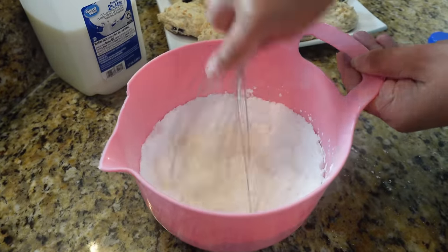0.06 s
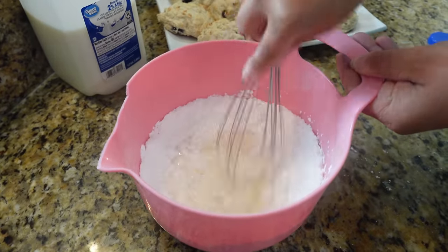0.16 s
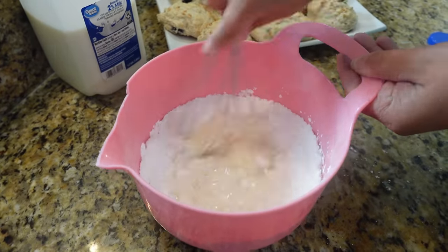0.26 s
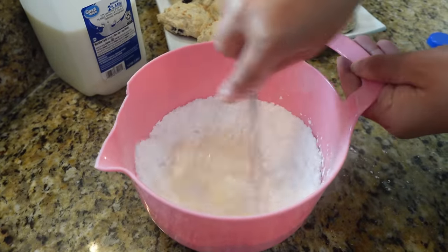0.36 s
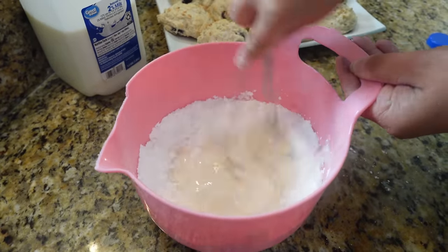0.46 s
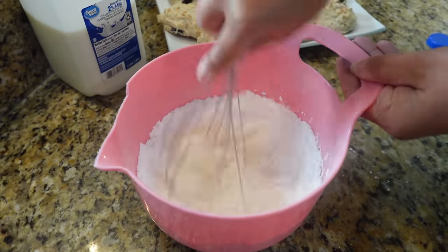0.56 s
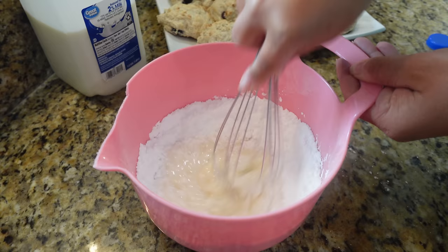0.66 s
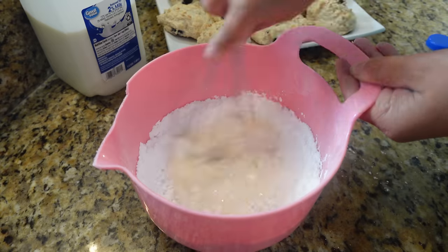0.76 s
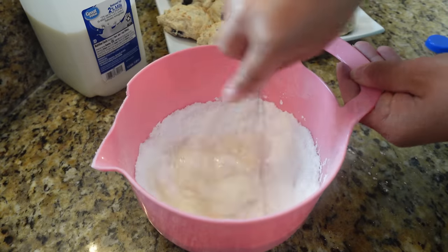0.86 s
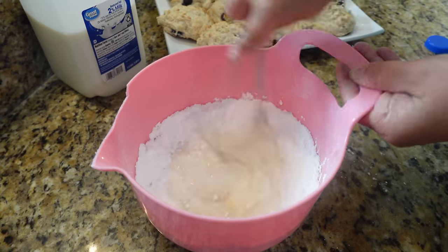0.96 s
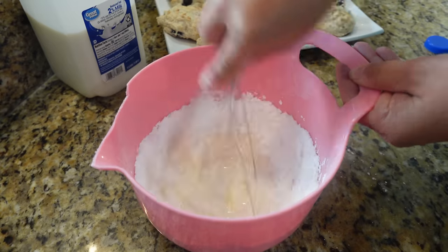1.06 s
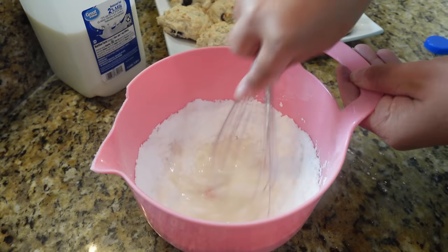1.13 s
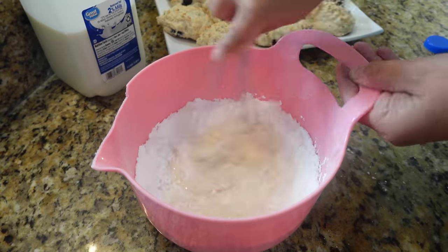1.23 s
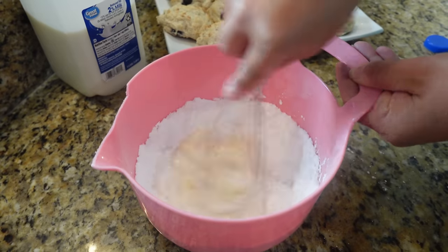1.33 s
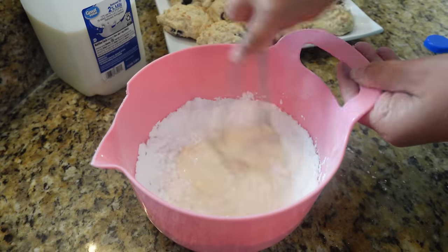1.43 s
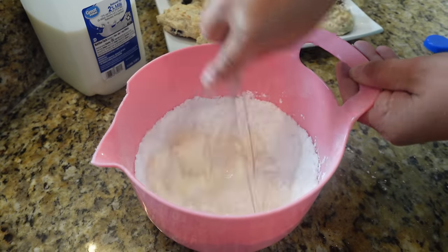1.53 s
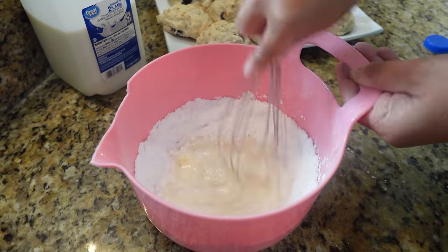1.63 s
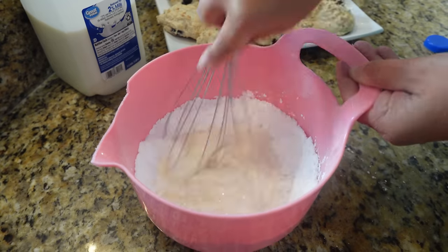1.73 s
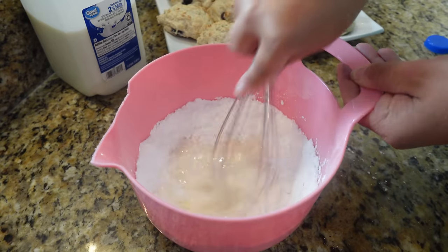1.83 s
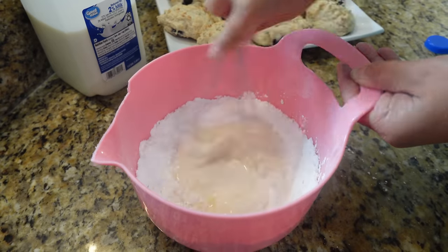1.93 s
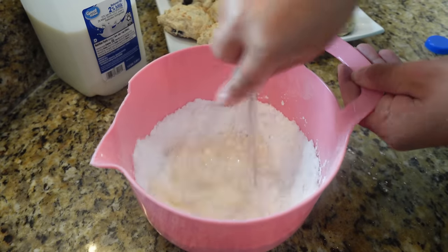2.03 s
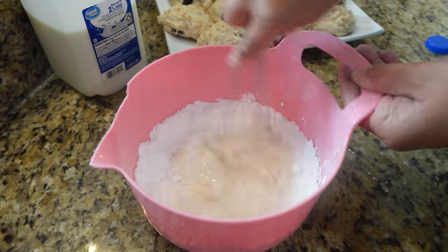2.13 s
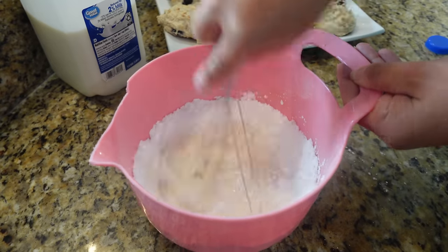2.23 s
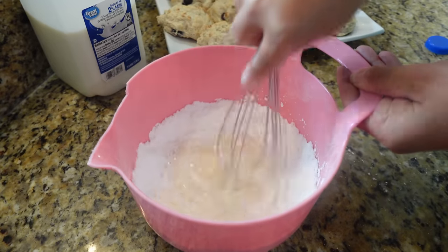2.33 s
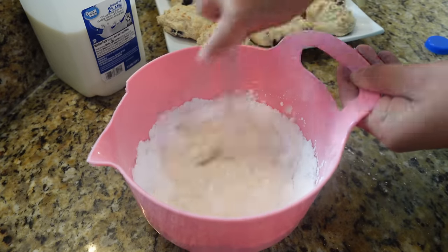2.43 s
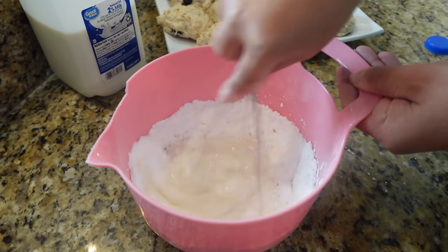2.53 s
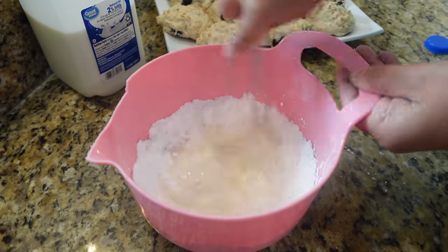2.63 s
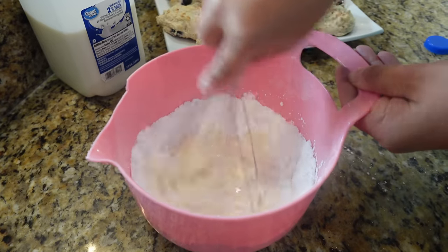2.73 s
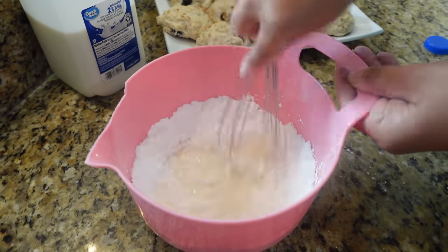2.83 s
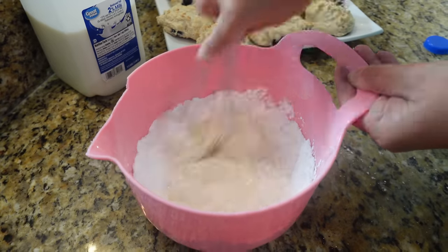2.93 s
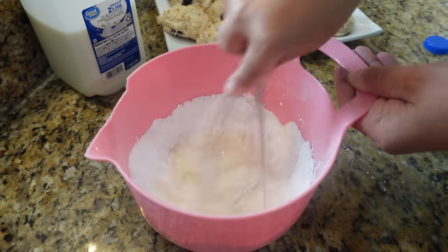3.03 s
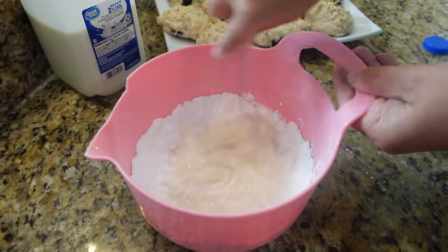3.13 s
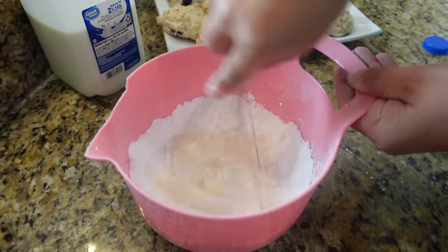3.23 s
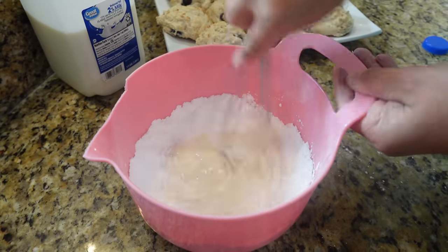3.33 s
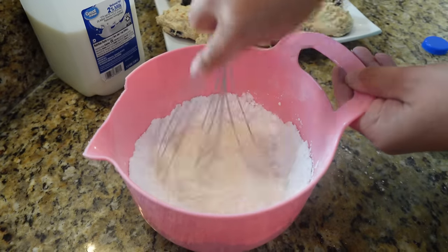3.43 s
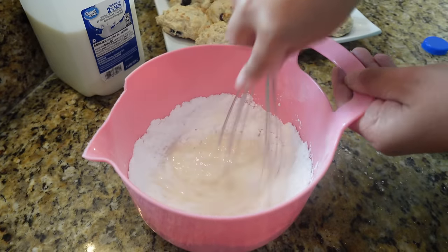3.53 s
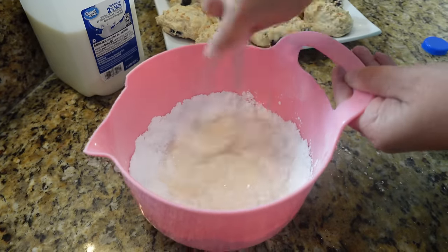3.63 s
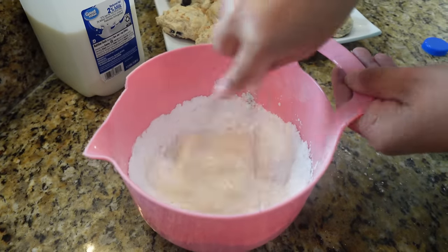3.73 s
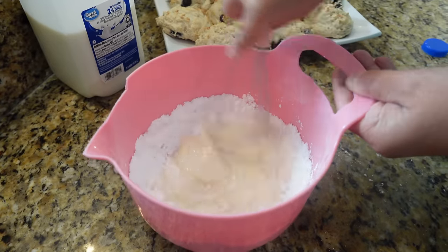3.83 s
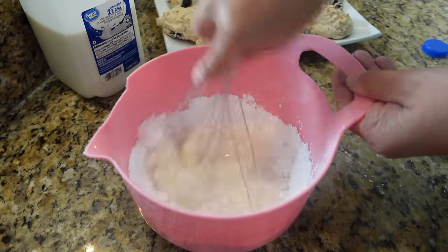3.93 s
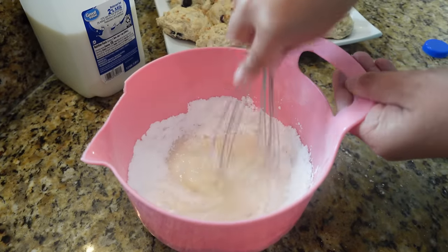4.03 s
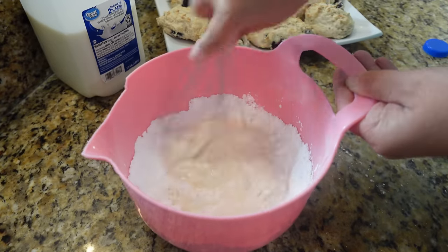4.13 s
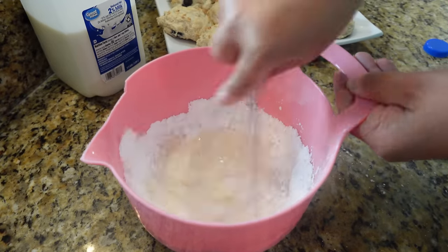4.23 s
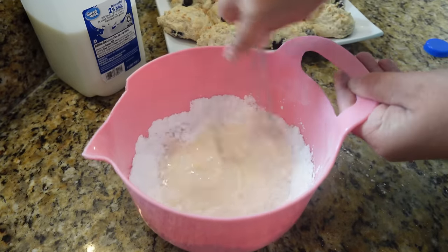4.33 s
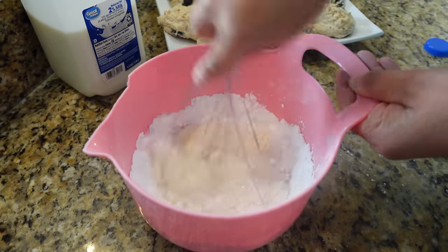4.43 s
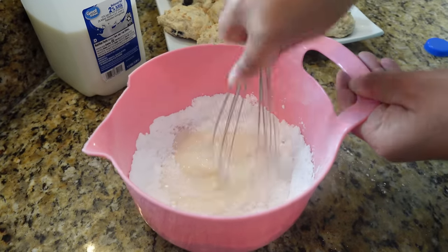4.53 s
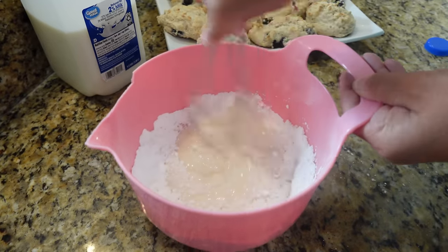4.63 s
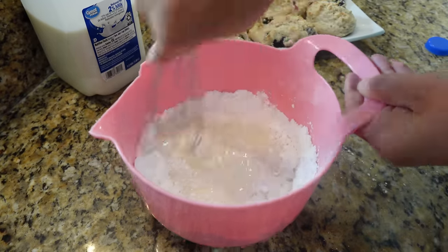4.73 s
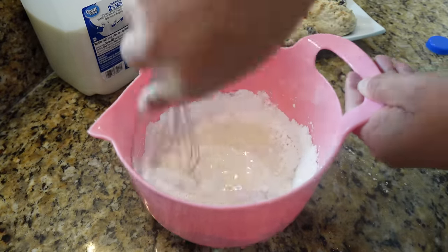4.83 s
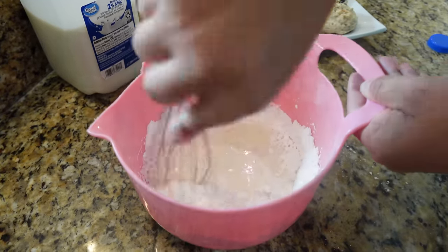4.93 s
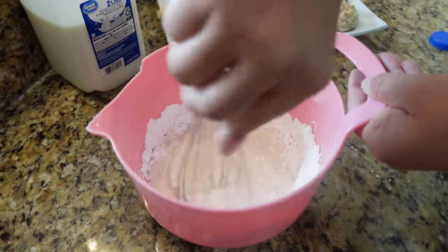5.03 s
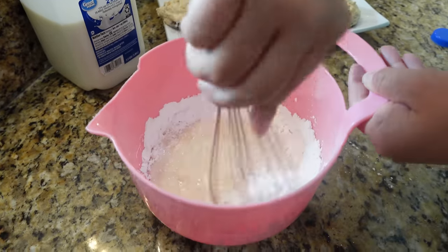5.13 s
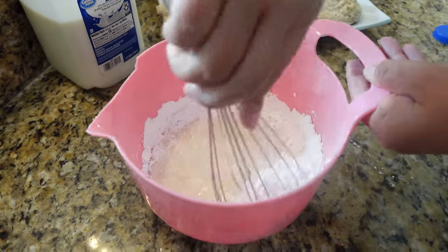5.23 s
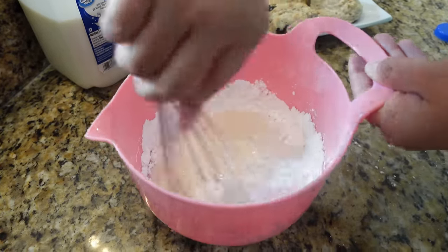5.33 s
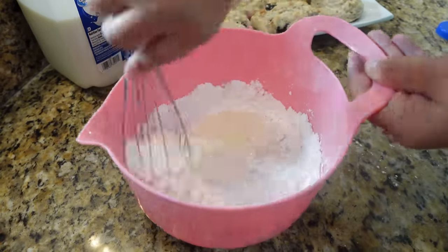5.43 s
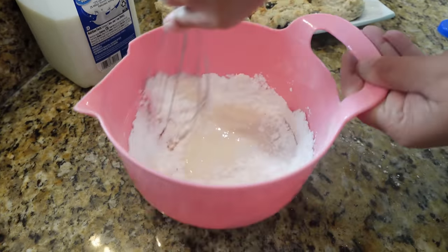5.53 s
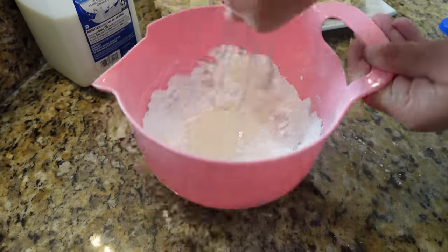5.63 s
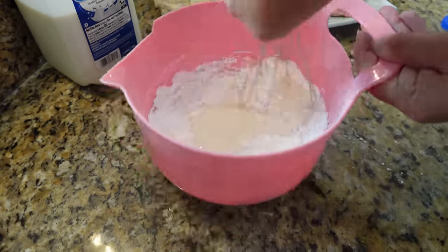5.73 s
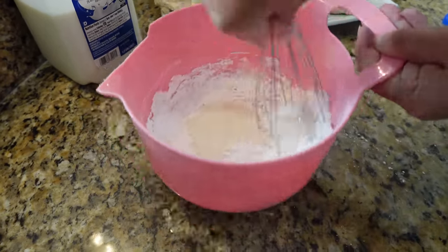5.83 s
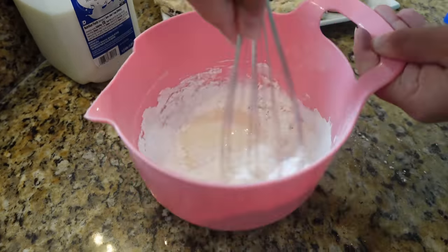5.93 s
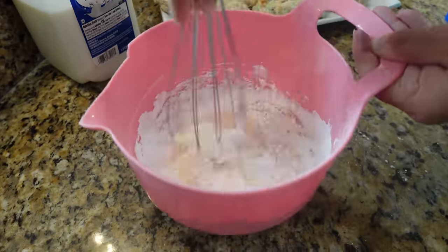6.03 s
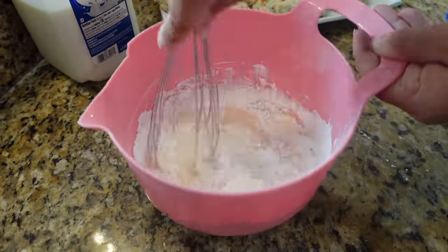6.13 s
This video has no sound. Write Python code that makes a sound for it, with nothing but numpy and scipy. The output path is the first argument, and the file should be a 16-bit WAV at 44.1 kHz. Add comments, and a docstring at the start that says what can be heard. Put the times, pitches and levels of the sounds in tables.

```python
"""Whisk in a plastic bowl

Close by, just right of centre, a wire whisk beats thick batter in a plastic bowl on a stone counter,
then scrapes flour off the wall in three long strokes. Stick-slip drag shakes the wall's resonances;
landing wires knock and tick on it, and bursts high in the treble are air pockets tearing in the batter.
The bowl hums as it rocks. A quiet kitchen with a short room echo and a mains hum lies underneath."""
import sys
import numpy as np
from scipy import signal
from scipy.fft import rfft, irfft, next_fast_len
from scipy.io import wavfile
from scipy.ndimage import uniform_filter1d

SR = 44100
rng = np.random.default_rng(int(sys.argv[2]) if len(sys.argv) > 2 else 0)


def undo_db(level):
    """Turn decibels back into plain size, where 20 dB means ten times bigger."""
    steps = np.asarray(level, float) / 20
    return 10 ** steps


def bounce(signal):
    """Save signal as a 16-bit WAV file at the path given by the first command-line argument."""
    frames = np.transpose(np.atleast_2d(signal))
    limited = np.clip(frames, -1, 1)
    pcm = np.round(limited * 32767).astype(np.int16)
    wavfile.write(sys.argv[1], SR, pcm)


N = 272097  # samples

# Levels in the tables and settings of the bowl are those ahead of its small level corrections.
# bowl wall resonances: (frequency [Hz], width [Hz], level while beating [dB], level while scraping [dB])
WALL = [(607, 64, -1, -4.5), (760, 130, -3, -7.5), (946, 275, -8, -12.5), (1280, 96, 0, 3),
        (1750, 260, -7, -10.5), (1990, 190, -2.5, 1.5), (2333, 254, 1.5, 2), (3095, 730, -5, -3),
        (3600, 340, -2.5, -1), (4080, 430, -2, -2), (4670, 740, -3.5, -7), (6130, 760, -8.5, -13),
        (7200, 950, -13.5, -15)]
# turns of the wrist: (loops meet the wall [s], loops leave it [s], swish on meeting [dB], drag [dB])
TURNS = [(0.062, 0.11, -36.5, -3), (0.304, 0.401, -38.5, 1.5), (0.563, 0.643, -47, -2.5),
         (0.828, 0.893, -39.5, 0), (1.055, 1.136, -41, 1), (1.303, 1.35, -41, 0), (1.535, 1.596, -39, -0.5),
         (1.751, 1.83, -43, 0.5), (2, 2.06, -45, 1.5), (2.222, 2.307, -42, 1), (2.477, 2.548, -35, 0.5),
         (2.725, 2.79, -34.5, 0.5), (2.974, 3.044, -32.5, 2), (3.207, 3.297, -37, 0), (3.45, 3.51, -36, 1),
         (3.691, 3.767, -38, 1), (3.95, 4.01, -42, 1.5), (4.178, 4.247, -40, 1), (4.437, 4.499, -38.5, 1)]
# loops rattling on the wall: (time [s], low ring level [dB], high ring level [dB],
# frequency of the leading ring [Hz], nominal length [s])
KNOCKS = [(.14, -38, -35.5, 3370, 0.012), (.237, -49, -39, 3300, .003), (.336, -46, -51, 600, 0.012),
          (0.399, -36, -40, 1800, 0.01), (.541, -37.5, -38, 1230, 0.0044), (0.593, -43, -54, 1030, .018),
          (0.658, -33.5, -37, 1180, 0.0077), (0.812, -33, -39, 1580, 0.0021),
          (0.869, -40, -34, 4200, 0.0048), (0.875, -36, -38, 760, 0.012), (.904, -36, -27, 2820, 0.0086),
          (.911, -42, -32, 3900, .008), (0.964, -42, -39.5, 2780, .008), (1.06, -36.5, -48, 1120, 0.018),
          (1.116, -28.5, -41, 1210, 0.0068), (1.151, -33.5, -50, 683, 0.0075),
          (1.15, -29.5, -50, 1650, .009), (1.148, -34.5, -27.5, 2800, 0.0096),
          (1.333, -38, -45, 1120, .016), (1.362, -48, -35, 3500, .003), (1.373, -45, -26.5, 3270, 0.0025),
          (1.38, -43, -35, 3400, 0.0073), (1.518, -36, -42, 1710, 0.0031), (1.582, -37.5, -44, 760, 0.009),
          (1.61, -40, -33, 3780, 0.0035), (1.619, -48, -33, 3300, .007), (1.621, -36, -48, 784, 0.006),
          (1.752, -48, -39, 4200, .005), (1.809, -36, -48, 780, 0.0063), (1.844, -34.5, -46, 1750, .0085),
          (1.854, -38, -38, 2600, .003), (1.913, -40, -44, 1500, .006), (2.049, -31, -39, 895, 0.0091),
          (2.073, -34.5, -31, 900, 0.011), (2.286, -32, -50, 1060, 0.0073),
          (2.318, -34.5, -35, 3450, 0.011), (2.487, -35.5, -37, 1710, 0.011), (2.507, -41, -38, 674, 0.006),
          (2.54, -34.5, -42, 836, 0.0056), (2.57, -26, -28, 2560, 0.0076), (2.616, -36, -35, 1590, 0.0041),
          (2.721, -42, -29, 2170, 0.0032), (2.777, -27.5, -43, 1250, 0.0075),
          (2.807, -37, -33, 1620, 0.0085), (2.819, -32, -28.5, 1750, 0.0053), (2.861, -48, -39, 3800, .004),
          (2.968, -42, -33, 2290, .003), (3.032, -29.5, -37, 1010, 0.0064),
          (3.057, -32.5, -32.5, 2800, 0.016), (3.262, -34, -46, 860, 0.0055),
          (3.296, -33.5, -35, 2980, .01), (3.324, -37.5, -44, 696, 0.006),
          (3.509, -21.5, -37, 1530, 0.0044), (3.531, -36, -31.5, 3300, 0.0069),
          (3.685, -40, -41, 1660, .0025), (3.728, -36, -48, 1230, 0.0096), (3.77, -31, -35, 2690, 0.014),
          (3.92, -39, -27.5, 3650, 0.0066), (3.927, -37.5, -28, 4090, 0.0075),
          (3.933, -45, -27.5, 4100, .003), (3.997, -30.5, -44, 920, 0.0044),
          (4.019, -30.5, -37.5, 4200, 0.016), (4.108, -38, -44, 1300, .01), (4.17, -39, -33.5, 1900, .02),
          (4.202, -38, -49, 1290, 0.012), (4.249, -41.5, -35, 2000, .0046),
          (4.272, -31.5, -33, 2880, 0.013), (4.367, -50, -37, 3020, .004),
          (4.486, -36.5, -43, 1480, 0.0082), (4.5, -33.5, -40, 1320, 0.0078),
          (4.537, -43, -33, 2820, 0.0076), (4.731, -45, -23, 3950, 0.0028), (4.744, -45, -30, 3520, .002),
          (4.805, -37.5, -29.5, 4560, .0064), (4.813, -33, -25.5, 2920, 0.0042),
          (4.913, -31, -31, 3600, 0.0052), (4.93, -42, -33.5, 2860, 0.012), (5.014, -37, -34, 2800, .016),
          (5.045, -42, -36, 3600, .02), (5.081, -35, -33, 3090, .009), (5.093, -38, -28.5, 3170, 0.0076),
          (5.111, -36, -34, 3050, .007), (5.139, -37, -31, 3060, 0.0038), (5.16, -44, -31, 2980, 0.0074),
          (5.211, -47, -37, 3200, 0.0094), (5.244, -38.5, -46, 1280, .007), (5.35, -48, -35.5, 3370, .0039),
          (5.411, -38, -29.5, 2750, 0.0062), (5.445, -36, -27, 3480, 0.0053), (5.47, -40, -32, 2400, .003),
          (5.509, -37, -40, 2920, .012), (5.58, -40, -32, 2480, 0.016), (5.613, -42, -26, 3950, 0.0041),
          (5.631, -39, -36, 4400, .0083), (5.671, -35, -42, 624, 0.0073), (5.672, -42, -38, 270, .008),
          (5.779, -56, -39, 3500, 0.029), (5.84, -48, -36, 2630, 0.019), (5.9, -36.5, -38, 1210, 0.011),
          (5.925, -42, -33, 2500, .0036), (5.96, -37, -38, 2460, 0.018), (5.989, -46, -31.5, 2440, .0044),
          (6.162, -34, -46, 1000, 0.0034), (6.163, -38, -50, 400, .005)]
# single wires striking bare wall ahead of a rattle: (time before a fixed lag [s], peak [dB], ring [Hz])
TICKS = [(0.143, -26, 3410), (0.401, -24, 1810), (0.529, -27, 3140), (0.543, -30, 1880), (0.659, -23, 1160),
         (0.811, -26, 2290), (1.118, -23, 1210), (1.373, -21, 3510), (1.518, -26, 2310), (1.609, -21, 3940),
         (1.617, -24, 2900), (1.854, -24, 1310), (2.049, -21, 649), (2.074, -20, 1670), (2.321, -19, 1260),
         (2.615, -25, 1530), (2.721, -22, 2250), (2.78, -20, 1340), (2.812, -22, 1740), (2.97, -22, 2310),
         (3.034, -21, 982), (3.531, -20, 2970), (3.685, -24, 2300), (3.919, -14, 3580), (4.022, -24, 1210),
         (4.246, -23, 1810), (4.271, -22, 1280), (4.368, -27.5, 1390), (4.523, -22, 2900),
         (4.814, -16.5, 2920), (4.918, -19, 3620), (5.11, -22, 3070), (5.139, -23, 3040),
         (5.413, -20, 2780), (5.447, -18, 3430), (5.456, -22, 1840), (5.469, -20, 3250), (5.612, -11, 4010),
         (5.622, -22, 4640), (5.632, -22, 1360), (5.669, -19, 595), (6.16, -27, 1300)]
# air pockets snapping in the batter and wires ticking together:
# (time before a fixed lag [s], peak [dB], centre frequency [Hz])
SNAPS = [(0.1146, -35, 9030), (0.256, -37, 8500), (0.6883, -20.5, 9600), (0.71, -35, 13500),
         (0.7582, -29, 13400), (0.8609, -30, 12700), (0.9448, -34, 11100), (1.1214, -32, 12200),
         (1.1915, -27, 10100), (1.2106, -30, 13700), (1.2311, -30, 12200), (1.254, -31, 14100),
         (1.285, -27, 8300), (1.5693, -35, 10400), (2.0527, -31, 10200), (2.1201, -31, 8740),
         (2.1784, -27, 14500), (2.2533, -35, 10700), (2.3446, -24, 13600), (2.4084, -29, 9800),
         (2.4823, -31, 9200), (2.5067, -31, 13000), (2.5975, -32, 15400), (2.6145, -31, 8500),
         (2.8335, -29, 13700), (2.8619, -37, 11500), (2.8923, -21, 12800), (3.1083, -31, 8680),
         (3.1462, -23, 15000), (3.3797, -19.5, 14300), (3.5793, -34, 10000), (3.6202, -22, 11300),
         (3.8222, -32, 9920), (3.8541, -25, 14700), (3.9196, -15, 10000), (3.9205, -21, 8500),
         (3.9235, -29, 11000), (3.9265, -24, 8000), (3.9295, -29, 10500), (3.9325, -26, 9000),
         (4.0672, -31, 10000), (4.1305, -29, 12600), (4.321, -34, 11000), (4.356, -32, 14300),
         (4.37, -30, 7200), (4.4568, -34, 13900), (4.577, -39, 8000), (4.7117, -14, 9050),
         (4.7315, -24, 9590), (5.138, -31, 9620), (5.3086, -43, 13500), (5.327, -40, 12800),
         (5.3395, -37, 13100), (5.601, -27, 9000), (5.6225, -25, 8000), (6.1033, -43, 11000),
         (6.1352, -43, 12500), (6.1447, -45, 12500), (6.1496, -44, 12700), (6.161, -45, 9000)]
# fine hiss of the drag: (frequency [Hz], relative density [dB per Hz])
DRAG_HISS = [(2940, -33), (5000, 1.5), (5400, 8), (7130, -1), (12700, -8.5), (15200, 0.5), (16000, -12)]
# one list per scraping stroke: (time [s], wire grit [dB], dryness as hiss over grit [dB],
# pitch the wires favour [Hz], their singing over grit [dB])
SCRAPES = [
    [(4.715, -40, 0, 3900, -16), (4.8, -41.5, 2.5, 3000, -12), (4.91, -38, -1, 3600, -9),
     (4.98, -39, 1, 2770, -12), (5.04, -36, 4, 3600, -3.5), (5.085, -37.5, 2, 3150, 1),
     (5.115, -42.5, -0.5, 3150, -1), (5.165, -40.5, 4, 3130, 2), (5.255, -54, -3.5, 3250, -2)],
    [(5.31, -58, -5, 3000, -12), (5.35, -48, 2, 3200, -14), (5.45, -36, -1, 3000, -14),
     (5.54, -40.5, 0.5, 2900, -10), (5.6, -35, 4, 3950, -1), (5.66, -42, -3, 3600, -14)],
    [(5.71, -40.5, -3, 3600, -12), (5.745, -42.5, -4, 3500, -10), (5.81, -39, 2, 3500, -8),
     (5.855, -42, 0, 2700, -10), (5.89, -43, -7.5, 2700, -10), (5.97, -42.5, -9.5, 2450, -6),
     (6, -41, -9, 2450, -3), (6.045, -45, -10.5, 2450, -2), (6.075, -63.5, -1, 2450, -8)],
]
# the hard tap that starts the scraping: (frequency [Hz], starting level [dB], time to fall 60 dB [s])
TAP_RINGS = [(595, -38, .05), (1230, -31, .03), (2000, -22, 0.026), (2500, -27, .008), (3000, -14, 0.013),
             (4200, -8.5, 0.006), (5580, -18, 0.0063), (9500, -32, .006)]
# bowl rocking on the counter: (time [s], bump over the steady level [dB])
BUMPS = [(1.13, 5.5), (2.06, 4.9), (3.71, 3.5), (4.9, 10), (5.67, 13), (5.91, 9.3), (6.165, 12)]
# kitchen air: (frequency [Hz], relative density [dB per Hz])
KITCHEN = [(18, -55), (30, -35.5), (140, -2.5), (379, -4), (479, -11.5), (591, -4), (639, -8), (808, -2),
           (996, -14), (1290, -6), (1870, -9.5), (2240, -10), (15500, -36)]
# left-right likeness of the kitchen air: (frequency [Hz], correlation [0 to 1])
LIKENESS = [(60, 0.47), (180, 0.81), (550, 0.35), (1650, 0.83), (4970, 0.32), (15000, 1)]

# drag round each turn: (mean, swing, place of the peak [turns after the loops leave the wall])
RING_DB, GRIT_DB, HISS_DB = (-48.5, 3.5, 0.0), (-47.5, 2.5, -0.1), (-54.5, 2, 0.2)
CENTRE_HZ = (2920, 270, 0.19)
BEAT_START_S, BEAT_STOP_S, BEAT_STOP_DB_PER_S = 0.025, 4.55, 250
SETTLE_DB = 15  # drop after the beating: the batter settles faintly
SCRAPE_RING_DB, RING_PER_DRY, SING_WIDTH_HZ = -6.5, -0.68, 170  # ring over grit; dB per dB of dryness

SPLIT_HZ = 1900  # between low and high wall rings
USUAL_LOW_HZ, USUAL_HIGH_HZ = 1286, 2490  # where the other ring of a knock sits
KNOCK_TOP_HZ = 5850  # the batter-coated wall gives little above this
SWISH_LOW_DB, SWISH_LOW_HZ, SWISH_HIGH_HZ, SWISH_S = -3, 1380, 2270, 0.015  # low ring against the high
STRAY_KNOCK_DB, STRAY_KNOCK_SPREAD_DB, STRAY_SNAP_DB, STRAY_SNAP_SPREAD_DB = -47, 3.5, -44, 3
TICK_LAG_S, TICK_DB, SNAP_LAG_S = 0.001105, -1, 0.0012
TICK_CYCLES, TICK_BROAD = 6.4, 0.53  # ring length [cycles]; share of broad splash
TAP_S = 4.7127

RUMBLE_HZ, RUMBLE_WIDTH_HZ = 262.7, 89
ROCK_BEAT_DB, ROCK_SCRAPE_DB, ROCK_WANDER_DB = -54.5, -63, 1.4
BUMP_RISE_DB_PER_S, BUMP_FALL_DB_PER_S = 200, 33
PAN_LOW_HZ, PAN_HIGH_HZ, PAN_SHARE, BOWL_DB = 380, 7500, 0.065, 1.17  # more middle range on the right

ROOM_T60_S, ROOM_DB, ROOM_CUT_HZ = 0.12, -18.5, 12000  # decay time before the dulling
ROOM_LOW_HZ, ROOM_HIGH_HZ = 2420, 13000
KITCHEN_DB, HUM_HZ, HUM_DB = -52.5, 119.6, -70
MIC_HISS_DB, MIC_LOW_HZ, MIC_TOP_HZ = -79, 60, 15950


def rms_one(x):
    """Scale to rms 1."""
    return x / np.sqrt(np.mean(x ** 2) + 1e-20)


def at_hz(points, hz):
    """Read a spectrum on a log-frequency axis."""
    points = np.array(points)
    return np.interp(np.log(hz), np.log(points[:, 0]), points[:, 1])


def drift(rate_hz):
    """Slow chance wandering of rms 1: twice-smoothed noise, drawn at every 40th sample."""
    pole = np.exp(-80 * np.pi * rate_hz / SR)
    noise = rng.standard_normal(N // 40 + 2002)
    slow = signal.lfilter([1], [1, -2 * pole, pole * pole], noise)[2000:]  # skip the filter's start
    return np.interp(np.arange(N) / 40, np.arange(len(slow)), rms_one(slow))


def resonance(x, hz, width_hz):
    """Two-pole resonance with gain 1 on top."""
    r = np.exp(-np.pi * width_hz / SR)
    poles = [1, -2 * r * np.cos(2 * np.pi * hz / SR), r * r]
    return signal.lfilter([(1 - r * r) / 2, 0, (r * r - 1) / 2], poles, x)


def band(x, low_hz, high_hz, order=2):
    """Butterworth band-pass."""
    edges = [low_hz, min(high_hz, .45 * SR)]
    return signal.sosfilt(signal.butter(order, edges, "band", fs=SR, output="sos"), x)


def low_pass(x, cut_hz, order):
    """Butterworth low-pass."""
    return signal.sosfilt(signal.butter(order, cut_hz, fs=SR, output="sos"), x)


def coloured(whites, spectrum):
    """Half-octave noise bank at rms 1; each band takes the input picked by whites(k, Hz)."""
    octaves = np.log2(spectrum[-1][0] / spectrum[0][0])
    edges = spectrum[0][0] * 2 ** np.arange(0, octaves + .5, .5)
    total = 0
    for k, (low, high) in enumerate(zip(edges, edges[1:])):
        if low < .4 * SR:
            middle = np.sqrt(low * high)
            total = total + undo_db(at_hz(spectrum, middle)) * band(whites(k, middle), low, high)
    return rms_one(total)


def slips(per_s, size_db, clump_db):
    """Stick-slip clicks of uneven size and either sign that come in clumps."""
    sizes = undo_db(size_db * np.minimum(rng.exponential(1, N), 5)) * rng.choice([-1, 1], N)
    return sizes * (rng.random(N) < per_s / SR) * undo_db(clump_db * drift(28))


def drag(controls, wall_db, per_s, size_db, wander_db, focus_db, catch_db):
    """One stream of slips shakes the wall; upper modes near the grit centre speak loudest."""
    ring_db, grit_db, hiss_db, centre_hz = controls
    fine_slips = slips(per_s, size_db, clump_db=1.17)
    lone_catches = slips(150., size_db=3., clump_db=2.0)
    force = fine_slips + undo_db(catch_db) * lone_catches
    ring, grit = 0, 0
    for k, ((hz, width_hz, *_), db) in enumerate(zip(WALL, wall_db)):
        # every mode flickers as the contact wanders
        flicker_db = wander_db * (0.77 * drift(18.0) + .55 * drift(4.))
        mode = (-1) ** k * undo_db(db + flicker_db) * resonance(force, hz, width_hz)
        if hz < SPLIT_HZ:
            ring = ring + mode
        else:
            octaves_off = np.minimum(abs(np.log2(hz / centre_hz)), 1)
            grit = grit + undo_db(-focus_db * octaves_off) * mode
    fine = [slips(2 * per_s, size_db, clump_db=1.7) for _ in range(2)]
    hiss = coloured(lambda k, hz: undo_db(1.5 * drift(7.1)) * fine[k % 2], DRAG_HISS)
    ring = undo_db(ring_db) * rms_one(band(ring, 546, 2540, order=3))
    grit = undo_db(grit_db) * rms_one(band(grit, 1300, 10500))
    return ring + grit + undo_db(hiss_db) * hiss


def beat_controls():
    """Drag rises and falls once per turn; each layer peaks at its own point of the circle."""
    t = np.arange(N) / SR
    _, leave_s, _, drag_db = np.transpose(TURNS)
    # one further turn at either end
    marks_s = np.r_[2 * leave_s[0] - leave_s[1], leave_s, 2 * leave_s[-1] - leave_s[-2]]
    turn = np.interp(t, marks_s, np.arange(len(TURNS) + 2))
    start_db = -6 * np.exp(-t / BEAT_START_S)
    stop_db = -np.minimum(BEAT_STOP_DB_PER_S * np.maximum(t - BEAT_STOP_S, 0), SETTLE_DB)
    effort_db = np.interp(t, leave_s, drag_db) + start_db + stop_db
    ring, grit, hiss, centre_hz = [mean + swing * np.cos(2 * np.pi * (turn - peak))
                                   for mean, swing, peak in (RING_DB, GRIT_DB, HISS_DB, CENTRE_HZ)]
    return ring + effort_db, grit + effort_db, hiss + effort_db, centre_hz


def beating():
    """Loops drag round the batter-wet wall, slipping thousands of times a second."""
    return drag(beat_controls(), np.array(WALL)[:, 2], per_s=3500., size_db=4.0,
                wander_db=2.4, focus_db=8., catch_db=11.5)


def all_knocks(strays=45):
    """Listed knocks, one swish per turn and weak strays at random moments of the beating."""
    rows = []  # (time [s], low level [dB], low ring [Hz], high level [dB], high ring [Hz], length [s])
    for s, low_db, high_db, hz, length_s in KNOCKS:
        low_hz = hz if hz < SPLIT_HZ else USUAL_LOW_HZ
        high_hz = hz if hz >= SPLIT_HZ else USUAL_HIGH_HZ
        rows.append((s, low_db, low_hz, high_db, high_hz, length_s))
    for s, _, db, _ in TURNS:
        rows.append((s, db + SWISH_LOW_DB, SWISH_LOW_HZ, db, SWISH_HIGH_HZ, SWISH_S))
    for u, g in zip(rng.random((strays, 4)), rng.standard_normal((strays, 2))):
        low_db, high_db = STRAY_KNOCK_DB + STRAY_KNOCK_SPREAD_DB * g
        rows.append((u[0] * BEAT_STOP_S, low_db, 850 * 2.15 ** u[1],
                     high_db, 2000 * 2.34 ** u[2], 0.0023 * 2.9 ** u[3]))
    return rows


def knocks(size=2048):
    """Wires land within milliseconds, cushioned by batter: a rough push rings two wall regions."""
    out, t = np.zeros(N + size), np.arange(size) / SR
    rows = all_knocks()
    landings = rms_one(uniform_filter1d(rng.standard_normal((len(rows), size)), size=30))  # single wires
    rough = rng.standard_normal((len(rows), size)) * undo_db(3.5 * landings)
    for (s, low_db, low_hz, high_db, high_hz, length_s), noise in zip(rows, rough):
        step = t / (0.42 * np.clip(length_s, .002, .03))
        push = noise * (step * np.exp(1 - step)) ** 1.12
        i = round(s * SR)
        for db, hz, sharp, broad, edge in ((low_db, low_hz, .11, .4, 1.6),
                                           (high_db, high_hz, .1, .35, 1.7)):
            ring = resonance(resonance(push, hz, sharp * hz), hz, 0.52 * hz)
            ring = ring + broad * band(push, hz / edge, hz * edge, order=3)
            rms_over_length = np.sqrt(np.sum(ring ** 2) / (length_s * SR))
            out[i:i + size] += undo_db(db - 3.0) * ring / rms_over_length
    return low_pass(out[:N], KNOCK_TOP_HZ, order=4)


def ticks(size=1024):
    """A hard click sets one wall ring going and splashes briefly over the rest."""
    out, t = np.zeros(N + size), np.arange(size) / SR
    for (s, peak_db, hz), noise in zip(TICKS, rng.standard_normal((len(TICKS), size))):
        click = np.eye(1, size)[0] + .1 * noise * np.exp(-t / 0.0014)
        ring = resonance(click, hz, 2.2 * hz / TICK_CYCLES)
        splash = band(click, 980, 5600)
        hit = ring / np.abs(ring).max() + TICK_BROAD * splash / np.abs(splash).max()
        i = round((s + TICK_LAG_S) * SR)
        out[i:i + size] += undo_db(peak_db + TICK_DB) * hit / np.abs(hit).max()
    return low_pass(out[:N], KNOCK_TOP_HZ, order=3)


def all_snaps(strays=130):
    """Listed snaps and weak strays at random moments of the beating."""
    weak = [(u[0] * BEAT_STOP_S, STRAY_SNAP_DB + STRAY_SNAP_SPREAD_DB * g, 6500 * 2.6 ** u[1])
            for u, g in zip(rng.random((strays, 2)), rng.standard_normal(strays))]
    return SNAPS + weak


def snaps(size=512):
    """A click and a short ragged after-spray ring high in the treble; a little reaches the wall."""
    out, t = np.zeros(N + size), np.arange(size) / SR
    rows = all_snaps()
    for (s, peak_db, hz), noise in zip(rows, rng.standard_normal((len(rows), size))):
        burst = np.eye(1, size)[0] + 0.092 * noise * np.exp(-t / 0.0015)
        treble = band(burst, 0.63 * hz, 1.56 * hz) + 1.9 * resonance(burst, hz, 0.15 * hz)
        pop = treble + 0.25 * band(burst, 2700, 5500)
        i = round((s + SNAP_LAG_S) * SR)
        out[i:i + size] += undo_db(peak_db + 0.1) * pop / np.abs(pop).max()
    return out[:N]


def scrape_controls():
    """The drier the wall, the more it hisses and the less it rings against the grit."""
    s, grit_db, dry_db, centre_hz, _ = np.transpose(sum(SCRAPES, []))
    t = np.arange(N) / SR
    grit_db = np.interp(t, s, grit_db, left=-120)  # silent before the first stroke
    dry_db = np.interp(t, s, dry_db)
    ring_db = grit_db + SCRAPE_RING_DB + RING_PER_DRY * dry_db
    return ring_db, grit_db, grit_db + dry_db, np.interp(t, s, centre_hz)


def scraping():
    """Loops pulled along the floury wall stick and slip in three strokes."""
    return drag(scrape_controls(), np.array(WALL)[:, 3], per_s=3000.0, size_db=3.6,
                wander_db=1.9, focus_db=6.5, catch_db=10.)


def singing(count=16):
    """Chattering wires sing at a narrow pitch that moves with the stretch of wall under the loops."""
    s, grit_db, _, centre_hz, sing_db = np.transpose(sum(SCRAPES, []))
    t = np.arange(N) / SR
    level_db = np.interp(t, s, grit_db + sing_db, left=-120)
    centre_hz = np.interp(t, s, centre_hz)
    chatter = slips(1500., size_db=3., clump_db=3.) * undo_db(3. * drift(45.))
    song = 0
    for hz in np.geomspace(2250, 4500, count):  # fixed resonances fade in as the pitch passes them
        nearness = np.exp(-(np.log2(hz / centre_hz) / 0.055) ** 2)
        song = song + nearness * rms_one(resonance(chatter, hz, SING_WIDTH_HZ))
    return undo_db(level_db) * rms_one(song)


def tap():
    """One sharp contact on bare wall and wire; neighbouring modes start in opposite directions."""
    t = np.maximum(np.arange(N) / SR - TAP_S, 0)
    rings = 0
    for k, (hz, db, t60_s) in enumerate(TAP_RINGS):
        rings = rings + (-1) ** k * undo_db(db - 60 * t / t60_s) * np.sin(2 * np.pi * hz * t)
    return band(rings, 450, 14000)


def rumble():
    """The whole bowl hums in its lowest mode and swells at each bump."""
    t = np.arange(N) / SR
    swells = [db - np.where(t < s, BUMP_RISE_DB_PER_S * (s - t), BUMP_FALL_DB_PER_S * (t - s))
              for s, db in BUMPS]
    bump_db = np.maximum(np.max(swells, axis=0), 0)
    steady_db = np.where(t < BEAT_STOP_S, ROCK_BEAT_DB, ROCK_SCRAPE_DB)
    level_db = steady_db + bump_db + ROCK_WANDER_DB * drift(3.3)
    hum = resonance(rng.standard_normal(N), RUMBLE_HZ, RUMBLE_WIDTH_HZ)
    return undo_db(uniform_filter1d(level_db, size=800)) * rms_one(band(hum, 146, 460))


def room(x, count=8):
    """Parallel feedback delays, other ones for each channel, duller on every round."""
    size = next_fast_len(N + SR)
    hz = np.fft.rfftfreq(size, 1 / SR)
    dull = 1 / (1 + 1j * hz / ROOM_CUT_HZ)
    spectrum = rfft(x, size)
    out = []
    for lags_s in rng.uniform(.0012, .022, (2, count)):
        response = 0
        for k, lag_s in enumerate(lags_s):
            loop = undo_db(-60 * lag_s / ROOM_T60_S) * dull * np.exp(-2j * np.pi * hz * lag_s)
            response = response + (-1) ** k * loop / (1 - loop)
        out.append(irfft(spectrum * response, size)[:N])
    echoes = np.array(out)
    # hard nearby surfaces return mostly the upper middle
    return band(echoes, ROOM_LOW_HZ, ROOM_HIGH_HZ) + 0.43 * echoes


def kitchen_air():
    """Steady household noise, partly unlike in the two channels, with a mains hum."""
    white = rng.standard_normal((2, 2, N))

    def pair(k, hz):
        """Noise shared by both channels plus noise of opposite sign in them."""
        alike = np.clip(at_hz(LIKENESS, hz), 0, 1)
        shared, opposed = white[k % 2]
        return np.sqrt(1 + alike) * shared + np.sqrt(1 - alike) * opposed * np.array([[1], [-1]])

    hum = np.sqrt(2) * undo_db(HUM_DB) * np.sin(2 * np.pi * HUM_HZ * np.arange(N) / SR)
    return undo_db(KITCHEN_DB) * coloured(pair, KITCHEN) + hum


def scene():
    """The bowl sits just right of centre, close to the microphone, in a quiet kitchen."""
    bowl = beating() + knocks() + ticks() + snaps() + scraping() + singing() + tap() + rumble()
    side = PAN_SHARE * band(bowl, PAN_LOW_HZ, PAN_HIGH_HZ, order=1)
    near = undo_db(BOWL_DB) * (bowl + side * np.array([[-1], [1]]))
    return near + undo_db(ROOM_DB) * room(bowl) + kitchen_air()


def top_cut(x):
    """Nothing passes above the cut-off."""
    return signal.sosfilt(signal.butter(12, 16980, fs=SR, output="sos"), x)


def record(dry):
    """The microphone hisses faintly and drops the deep bass; the top is cut steeply."""
    hissy = dry + undo_db(MIC_HISS_DB) * rng.standard_normal(dry.shape)
    wet = signal.sosfilt(signal.butter(2, MIC_LOW_HZ, "high", fs=SR, output="sos"), hissy)
    mix = signal.sosfilt(signal.cheby2(12, 45, MIC_TOP_HZ, fs=SR, output="sos"), wet)
    return top_cut(mix)


dry = scene()
out = record(dry)
bounce(out)
```